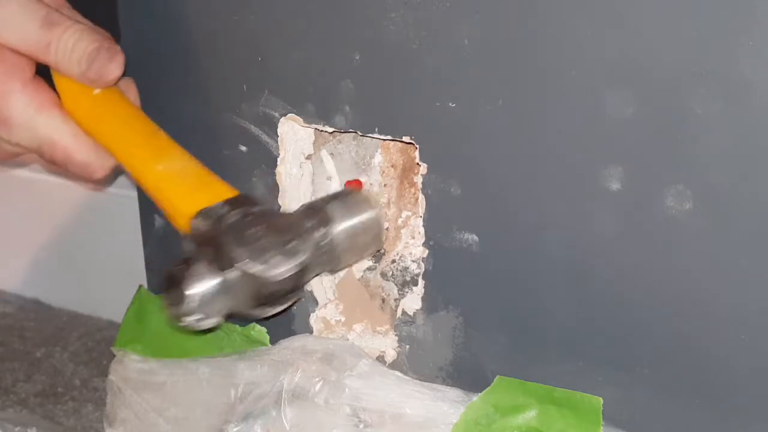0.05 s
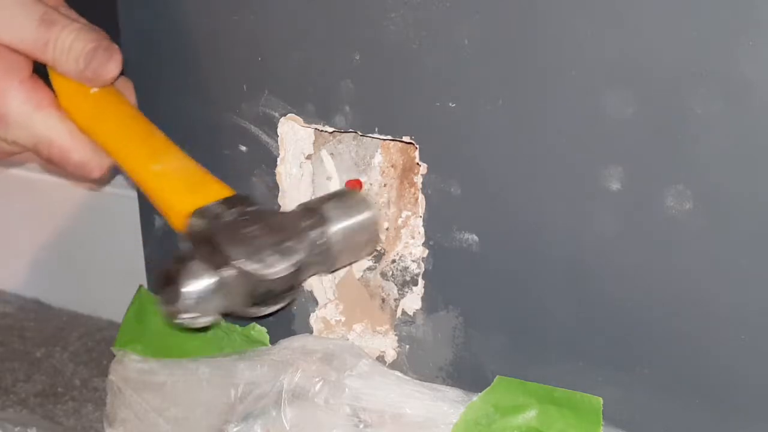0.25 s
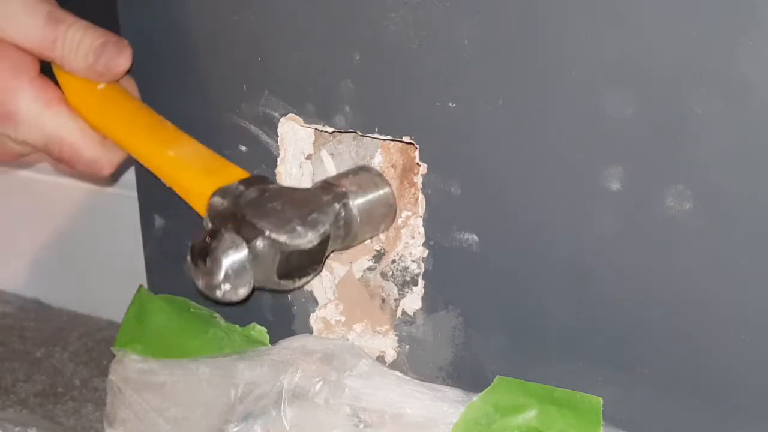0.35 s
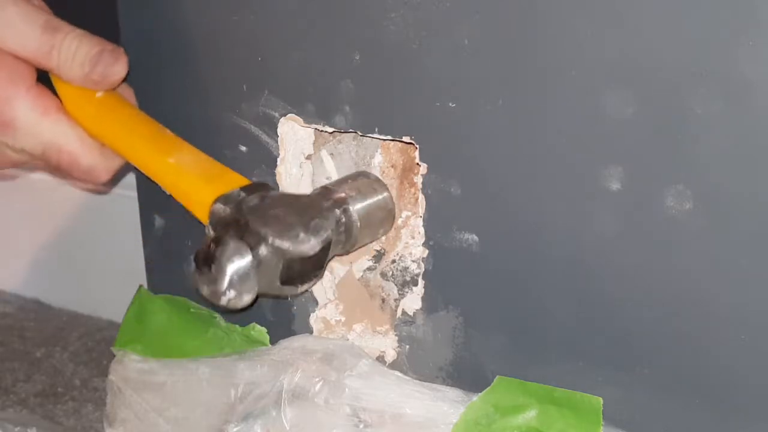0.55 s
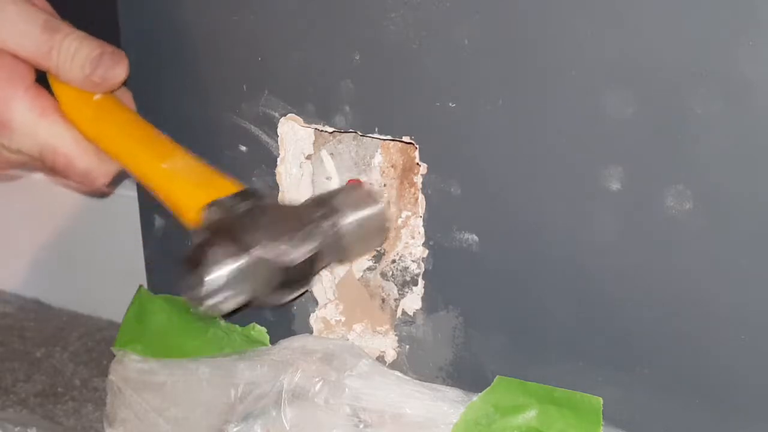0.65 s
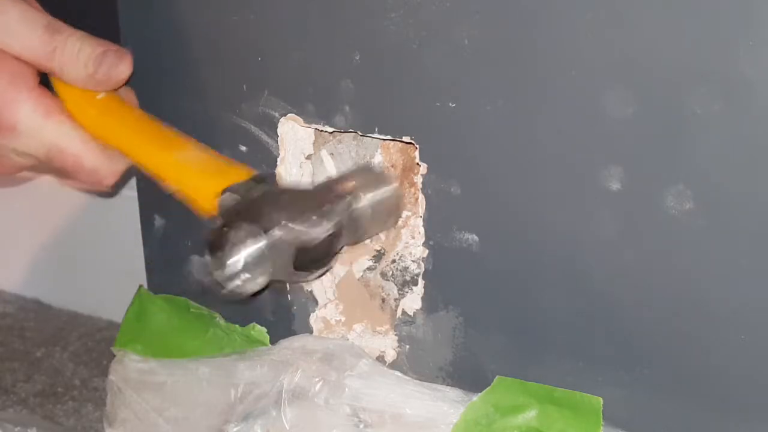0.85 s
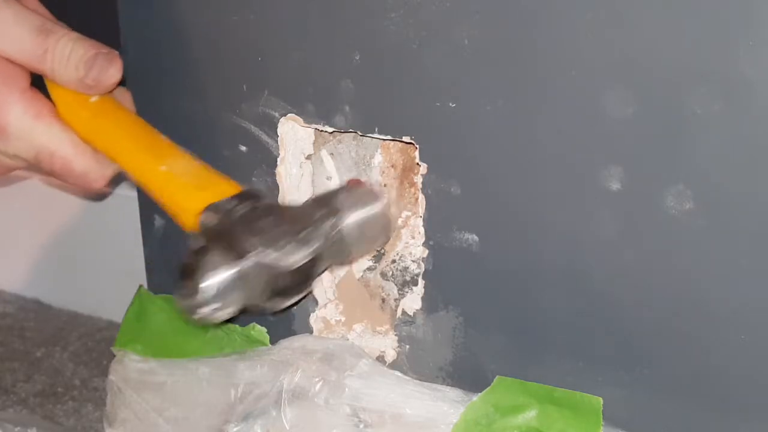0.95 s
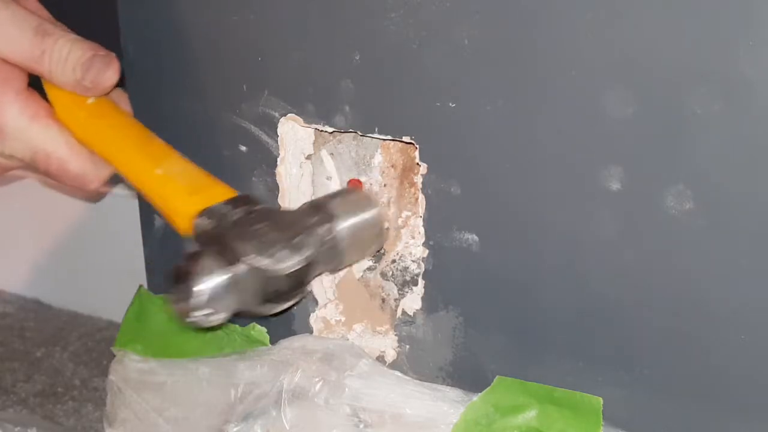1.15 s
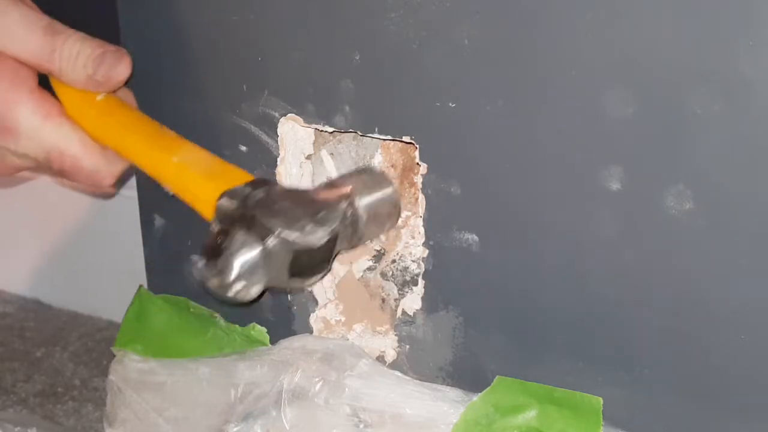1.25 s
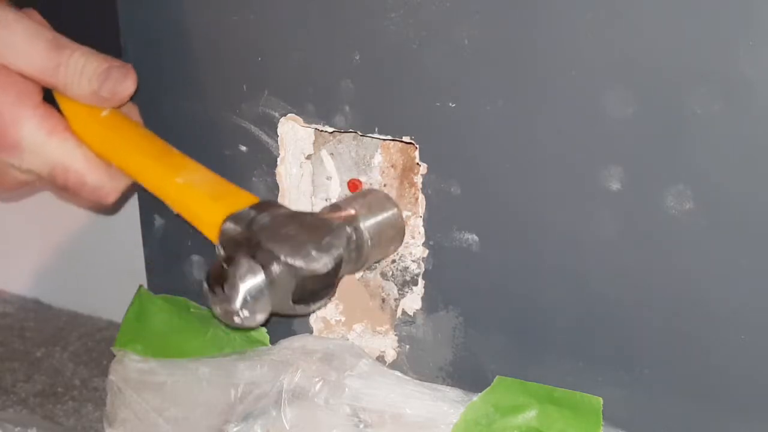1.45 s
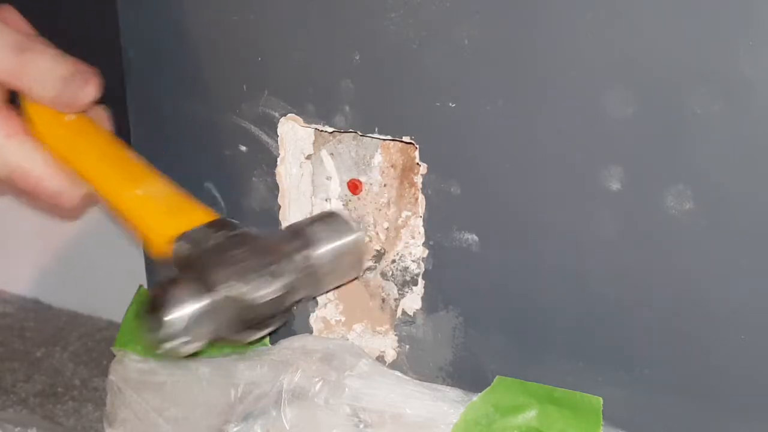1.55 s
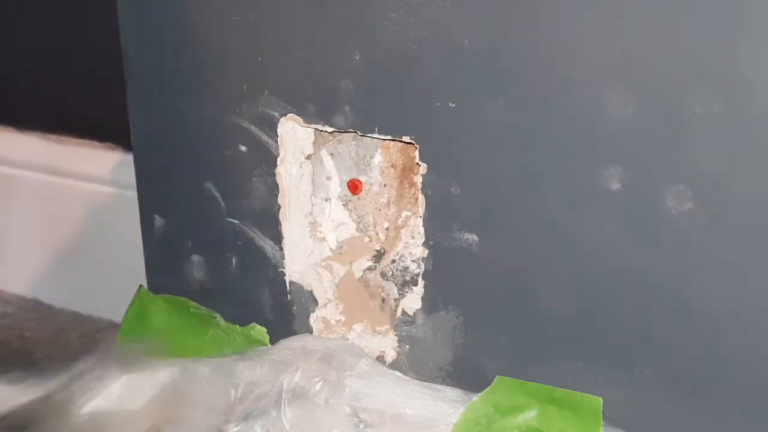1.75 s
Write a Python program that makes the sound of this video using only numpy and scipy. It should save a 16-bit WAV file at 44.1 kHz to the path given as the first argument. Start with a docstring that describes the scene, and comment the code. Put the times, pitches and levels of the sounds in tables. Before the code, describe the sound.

A steel hammer taps a plastic plug into a masonry wall, close by in a small room. Nine quick, even clacks each carry a brief low boom, and the last is a much louder crack.

```python
"""Hammering a plug into a wall

A steel hammer taps a plastic plug into a masonry wall, close by in a small room. Each impact
radiates a broadband clack and excites damped modes: a brief ring of hammer, plug and wall,
and the same low boom of wall and room. Reflections and reverberation follow. With the plug
flush, the last blow lands on the wall itself and overloads the microphone."""
import sys
import numpy as np
from scipy import signal
from scipy.fft import rfft, irfft, next_fast_len
from scipy.io import wavfile

SR = 44100
rng = np.random.default_rng(int(sys.argv[2]) if len(sys.argv) > 2 else 0)


def wav_out(sig):
    """Save sig, one row per channel (or a flat mono array), as 16-bit PCM at SR to the path in sys.argv[1]."""
    wavfile.write(sys.argv[1], SR, np.round(np.clip(np.atleast_2d(sig).T, -1, 1) * 32767).astype(np.int16))


N = 79380
SIZE = 32768  # samples in one impact response
T = np.arange(SIZE) / SR
F = np.fft.rfftfreq(SIZE, 1 / SR)


# Hammer blows (time [s], gain at each of the five TONE_HZ [dB], push gain [dB])
BLOWS = [(0.0121, -1.5, -9, 0.5, -3.5, 0.5, -6), (.195, 0, -4, 0, 3.5, 4.5, -0.5),
         (.381, -1, -2, 0.5, 3.5, 3.5, -1.5), (0.5491, -1.5, 1.5, -1, 2, -4.5, -0.5),
         (0.7249, -1, 2, -3, -5.5, -9.5, -3), (.911, -1, 2, -4, -6, -8.5, -2.5),
         (1.1033, 0, 2, -1, -2, -4, -1.5), (1.2967, 1.5, 2.5, 7, 3, -3, 1), (1.4695, 1.5, 4, 8, 2, 0, -0.5)]
TONE_HZ = (170, 330, 1100, 4030, 11000)
CLACK_RISE_S, ROOM_RISE_S, ROOM_DELAY_S = 0.00077, 0.009, 0.004

def taps():
    """Superposition: each tap is direct sound, early reflections and reverberation in one tone colour."""
    out = np.zeros((2, N))
    room = decaying_noise(ROOM_DECAY, ROOM_RISE_S)
    contact = decaying_noise(CLACK_DECAY, CLACK_RISE_S)
    for onset, *gains_db, push_db in BLOWS:
        tone = list(zip(TONE_HZ, gains_db))
        mid, side = clack(contact)
        mid = mid + amp(push_db) * plug_push() + boom()
        mid = mid + delayed(hammer_ring() + wall_ring(), delay_s=0.000816)
        add(out, onset, colour(stereo([mid, side], DIRECT_SIDE, DIRECT_BALANCE), tone))
        for delay_s, db in EARLY_REFLECTIONS:
            add(out, onset + delay_s, amp(db) * colour(reflection(), tone))
        add(out, onset + ROOM_DELAY_S, colour(reverberation(room), tone))
    return out


# Spectrum of the contact (frequency [Hz], level [dB])
CLACK_SPECTRUM = [(30, -20.5), (100, -18), (400, 6), (650, 6), (950, 11.5), (1750, 11), (2050, 0),
                  (3100, 0), (3500, -9), (6700, -12.5), (7800, -27), (11500, -16.5), (16000, -31)]
# Its time to fall by 60 dB (frequency [Hz], T60 [s])
CLACK_DECAY = [(500, 0.056), (1700, .025), (4000, 0.024), (10000, 0.0068)]

def clack(contact):
    """Impact noise: a short contact excites a broad band, much alike from tap to tap."""
    fresh = decaying_noise(CLACK_DECAY, CLACK_RISE_S)
    return colour(vary(contact, fresh, ratio=0.35), CLACK_SPECTRUM)


def plug_push(hz=1106, peak_s=0.002093, width_s=0.00063):
    """Acceleration noise: the plug gives way in one short push, a Gaussian tone pulse."""
    t = T - peak_s
    return amp(-11.5) * np.exp(-(t / width_s) ** 2 / 2) * np.cos(2 * np.pi * hz * t)


# Modes of hammer and plug (frequency [Hz], level [dB], T60 [s])
HAMMER_MODES = [(960, -32, 0.014), (1214, -32, 0.0208), (1432, -28.5, 0.042), (1555, -30.5, 0.13),
                (1733, -22, 0.071), (1817, -35.5, .06), (2574, -35, .03), (2830, -31.5, 0.022),
                (3188, -35.5, .04), (5170, -45.5, .018), (6645, -43, 0.015), (9200, -45.5, 0.02),
                (11300, -43, 0.021)]

def hammer_ring():
    """Free vibration: hammer and plug ring briefly at their natural frequencies."""
    return damped_modes(HAMMER_MODES, rise_s=0.0011, spread_db=2.5)


# Low modes of wall and room (frequency [Hz], level [dB], T60 [s])
BOOM_MODES = [(57.3, -36, 0.39), (87.56, -26, 0.41), (105.23, -32.5, 0.51), (127.5, -13, 0.12),
              (145.5, -14, 0.15), (150, -23.5, 0.081), (182.7, -19.5, .18), (199.25, -16, 0.23),
              (221.9, -14, .11), (276.5, -8.5, 0.067), (308.5, -7.5, 0.07), (329, -17, 0.094),
              (368.3, -21, 0.091), (431, -18.5, 0.099)]
# Low cut that keeps deep bass out of the boom (frequency [Hz], gain [dB])
BOOM_LOW_CUT = [(20, -19.5), (45, -7), (80, 0)]
# Returns from the far walls (delay [s], amplitude [ratio])
FAR_RETURNS = [(.0382, 0.27), (0.0881, 0.087)]

def boom():
    """Resonance: every blow excites the same low modes, and far walls send their sound back."""
    modes = damped_modes(BOOM_MODES, rise_s=0.015, spread_db=1.25)
    trimmed = colour(modes, BOOM_LOW_CUT)
    return trimmed + sum(gain * delayed(trimmed, delay_s) for delay_s, gain in FAR_RETURNS)


# Higher modes of the wall (frequency [Hz], level [dB], T60 [s])
WALL_MODES = [(436, -43, 0.11), (574.6, -39, 0.23), (586.2, -36, .15), (627, -50.5, .15), (780, -40, 0.207),
              (889, -46, .15), (1025, -32.5, .14), (1052, -38.5, .15), (1131, -40.5, 0.15),
              (1230, -39, 0.16), (1337, -43, .18), (1470, -41, 0.1), (2207, -56.5, .14),
              (3855, -65.5, 0.15)]

def wall_ring():
    """Modal response: the masonry rings on after each blow."""
    return damped_modes(WALL_MODES, rise_s=0.0034, spread_db=1.2)


# Direct and reverberant spectra of the blow on the wall (frequency [Hz], level [dB])
SLAM_SPECTRUM = [(30, -19), (100, 13.5), (300, 19.5), (500, 26.5), (950, 36), (1700, 30), (2100, 18.5),
                 (3300, 16.5), (5000, 7), (8000, -14), (11000, -6), (16000, -21.5)]
SLAM_REVERB_SPECTRUM = [(30, -8), (100, 19), (280, 18.5), (430, 29), (650, 29.5), (1050, 33), (1700, 24),
                        (2100, 20), (3000, 16), (5000, 5.5), (6500, -2.5), (8000, -14), (11500, -12),
                        (16000, -24.5)]
# Decay of its direct sound (frequency [Hz], T60 [s])
SLAM_DECAY = [(500, .05), (1500, 0.025), (4000, 0.023), (10000, 0.02)]

def slam(onset=1.4698):
    """Hard impact: steel meets plaster in a broadband crack that drives the wall and fills the room."""
    out = np.zeros((2, N))
    mid, side = colour(decaying_noise(SLAM_DECAY, rise_s=0.00038), SLAM_SPECTRUM)
    mid = mid + amp(15.5) * wall_ring()
    add(out, onset, stereo([mid, side], DIRECT_SIDE, ROOM_BALANCE))
    tail = colour(decaying_noise(ROOM_DECAY, rise_s=0.003), SLAM_REVERB_SPECTRUM)
    add(out, onset + ROOM_DELAY_S, stereo(tail, ROOM_SIDE, ROOM_BALANCE))
    return out


# Arrivals from near surfaces (delay [s], gain [dB])
EARLY_REFLECTIONS = [(.019, -13), (.029, -11)]
# Spectrum of the scattered sound (frequency [Hz], level [dB])
SCATTER_SPECTRUM = [(30, -22), (400, 1.5), (950, 8), (1750, 8.5), (2200, -1), (3300, -0.5), (4200, -18.5),
                    (8000, -23), (16000, -33)]
# Its decay (frequency [Hz], T60 [s])
SCATTER_DECAY = [(500, 0.044), (4000, 0.037)]

def reflection():
    """Diffuse reflection: a rough near surface returns the clack as a short burst of noise."""
    scattered = colour(decaying_noise(SCATTER_DECAY, rise_s=0.003), SCATTER_SPECTRUM)
    return stereo(scattered, ROOM_SIDE, ROOM_BALANCE)


# Spectrum of the room's response to a tap (frequency [Hz], level [dB])
REVERB_SPECTRUM = [(30, -18), (150, -3), (300, 6.5), (550, 13), (1300, 8.5), (1750, 8), (2000, 1.5),
                   (3100, -11.5), (4000, -9.5), (6500, -20), (8000, -27), (12000, -24), (16000, -41.5)]
# Reverberation time (frequency [Hz], T60 [s])
ROOM_DECAY = [(100, 0.46), (400, 0.24), (1200, .26), (4000, 0.29), (12000, 0.31)]

def reverberation(room):
    """Diffuse field: dense reflections merge into a decaying tail, slightly different for each tap."""
    fresh = decaying_noise(ROOM_DECAY, ROOM_RISE_S)
    tail = colour(vary(room, fresh, ratio=0.28), REVERB_SPECTRUM)
    return stereo(tail, ROOM_SIDE, ROOM_BALANCE)


# Spectrum of the background (frequency [Hz], level [dB])
AMBIENT_SPECTRUM = [(20, -11.5), (35, -4), (58, 9), (90, 0), (150, -8), (400, -21.5), (1000, -15),
                    (1900, -22), (2600, -24), (4200, -24), (6500, -30), (8000, -38), (13000, -30.5),
                    (16000, -33.5)]

def room_tone():
    """Stationary noise: a faint, steady rumble and hiss."""
    gain = amp(along(AMBIENT_SPECTRUM, np.fft.rfftfreq(N, 1 / SR)))
    noise = irfft(rfft(rng.standard_normal((2, N))) * gain, N)
    return amp(-54) * stereo(noise / noise.std(), ROOM_SIDE, ROOM_BALANCE)


# Level difference between the channels (frequency [Hz], left minus right [dB])
DIRECT_BALANCE = [(100, -5.5), (500, -7), (1100, -8), (2000, -9.5), (4000, -5), (9000, -21.5), (14000, -12)]
ROOM_BALANCE = [(100, -4.5), (600, -5), (1200, -8), (4000, -7.5), (12000, -2.5)]
# Width of the sound field (frequency [Hz], side gain relative to mid [dB])
DIRECT_SIDE = [(100, -26.5), (350, -20.5), (1200, -13), (4000, -2.5), (12000, -8)]
ROOM_SIDE = [(40, -9), (100, -12), (300, -15.5), (550, -9.5), (1200, -2), (2500, -4), (12000, -2)]

def stereo(pair, width, balance):
    """Mid-side stereo: sum and difference give left and right; level places the wall to the right."""
    length = len(pair[0])
    hz = np.fft.rfftfreq(length, 1 / SR)
    mid, side = rfft(pair)
    side = side * amp(along(width, hz))
    lean = amp(along(balance, hz))
    return irfft(np.array([(mid + side) * lean, mid - side]) * 2 / (1 + lean), length)


def damped_modes(modes, rise_s, spread_db):
    """Modal synthesis: a sum of damped sines whose strengths vary at random with each strike."""
    gains = amp(spread_db * rng.standard_normal(len(modes)))
    x = sum(gain * amp(db) * np.exp(-np.log(1000) * T / t60) * np.sin(2 * np.pi * hz * T)
            for gain, (hz, db, t60) in zip(gains, modes))
    return x * (1 - np.exp(-T / rise_s))


def decaying_noise(decay, rise_s):
    """Frequency-dependent damping: mid and side noises of unit energy, each band with its own T60."""
    hz, t, bands = signal.stft(rng.standard_normal((2, SIZE)), SR, nperseg=128)
    t60 = np.maximum(along(decay, hz), 0.003)[:, None]
    bands = bands * amp(-60 * t / t60) / np.sqrt(t60)
    x = signal.istft(bands, SR, nperseg=128)[1][:, :SIZE]
    x = x * (1 - np.exp(-T / rise_s))
    return x / np.linalg.norm(x, axis=1, keepdims=True)


def colour(x, points):
    """Minimum-phase filter through (Hz, dB) points: folding the cepstrum makes it causal."""
    cepstrum = irfft(np.log(amp(along(points, F))))
    cepstrum[1:SIZE // 2] *= 2
    cepstrum[SIZE // 2 + 1:] = 0
    return irfft(rfft(x) * np.exp(rfft(cepstrum)))


def vary(same, fresh, ratio):
    """Incoherent addition: two independent noises blend at constant power."""
    return (same + ratio * fresh) / np.hypot(1, ratio)


def amp(db):
    """Amplitude ratio from decibels."""
    return 10 ** (np.asarray(db) / 20)


def along(points, hz):
    """Interpolation of (Hz, value) points on a logarithmic frequency axis."""
    knots_hz, values = np.transpose(points)
    return np.interp(np.log(hz + 1), np.log(knots_hz + 1), values)


def delayed(x, delay_s):
    """Fractional delay by linear interpolation."""
    return np.interp(T - delay_s, T, x, left=0)


def add(track, onset, x):
    """Superposition of x on the track from the onset, in seconds."""
    start = max(round(onset * SR), 0)
    track[:, start:start + SIZE] += x[:, :N - start]


def scene():
    """Sound pressures add: the taps and the blow on the wall over the quiet room."""
    return taps() + slam() + room_tone()


def record(dry):
    """Saturation and band limiting: peaks clip at full scale, then the highest treble is removed."""
    hardness, top_hz = 10, 16300
    clipped = dry / (1 + np.abs(dry) ** hardness) ** (1 / hardness)
    padded = next_fast_len(N + SIZE)
    passband = np.fft.rfftfreq(padded, 1 / SR) < top_hz
    return irfft(rfft(clipped, padded) * passband, padded)[:, :N]


dry = scene()
out = record(dry)
wav_out(out)
```